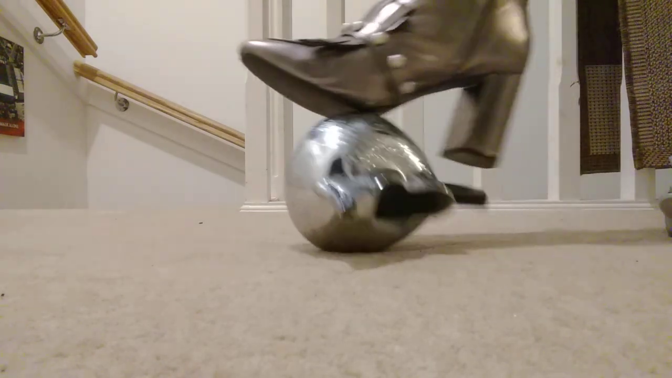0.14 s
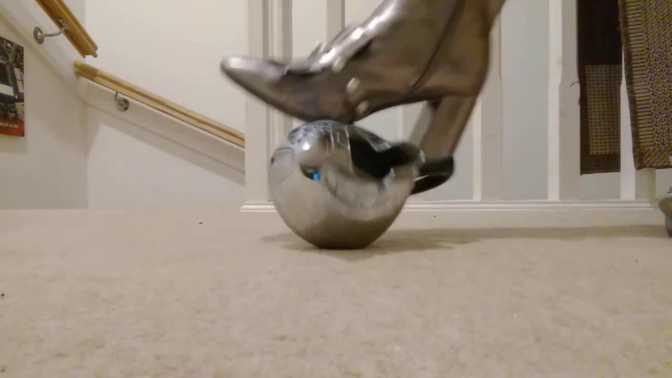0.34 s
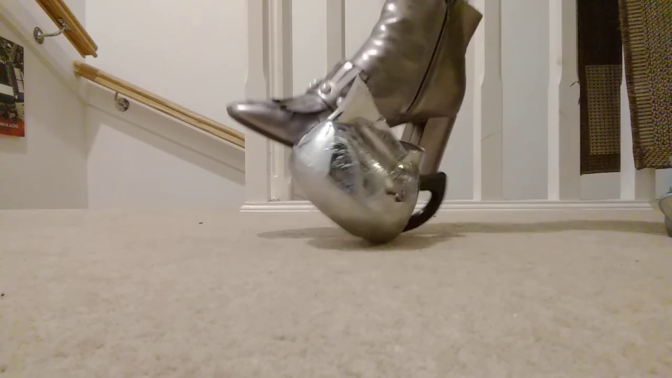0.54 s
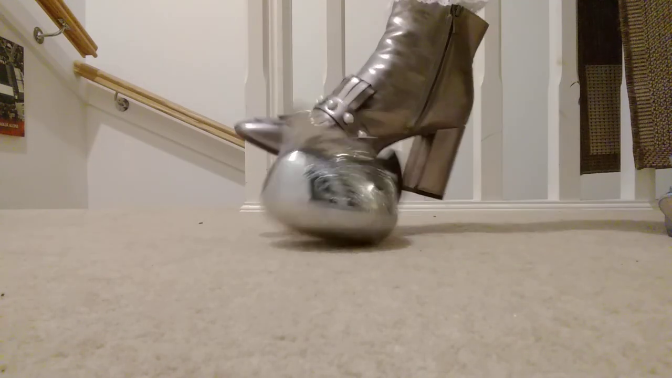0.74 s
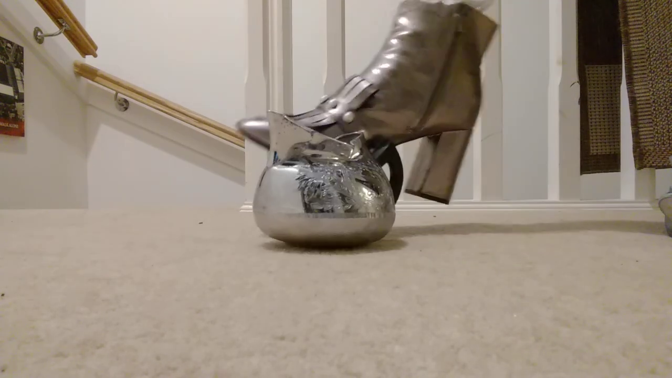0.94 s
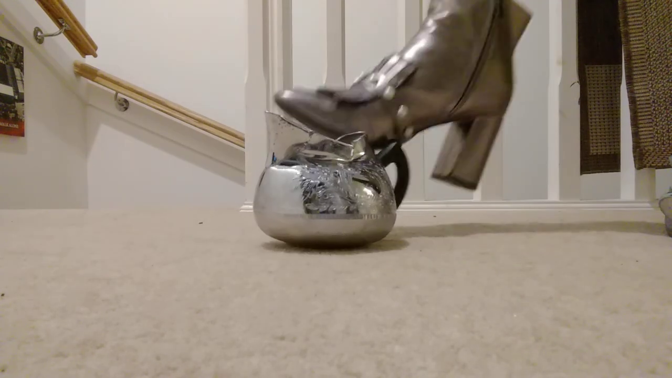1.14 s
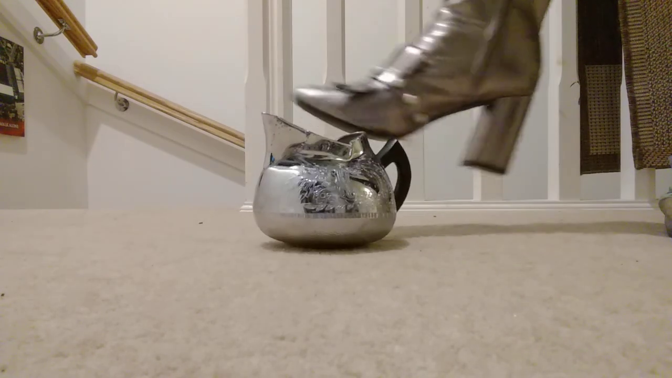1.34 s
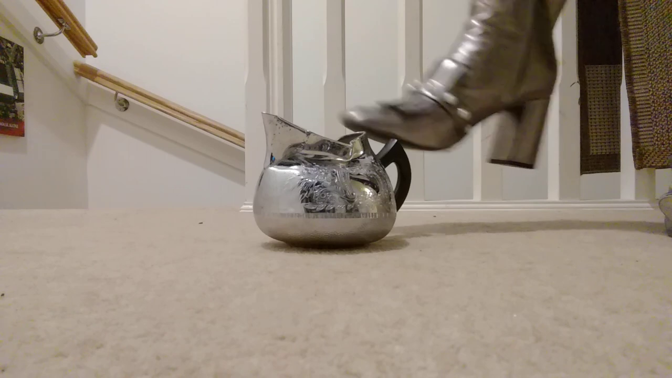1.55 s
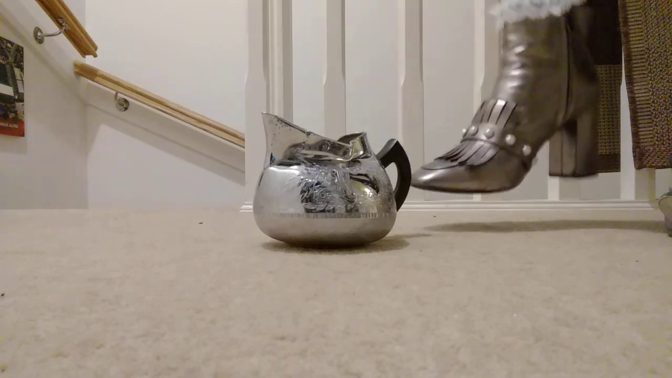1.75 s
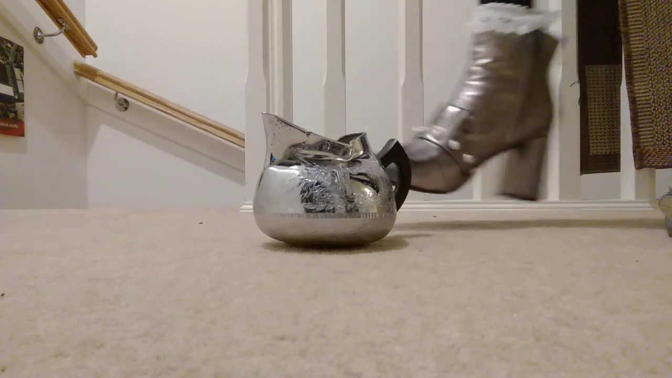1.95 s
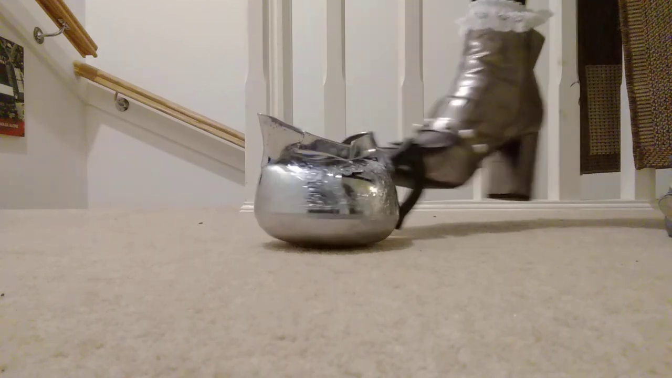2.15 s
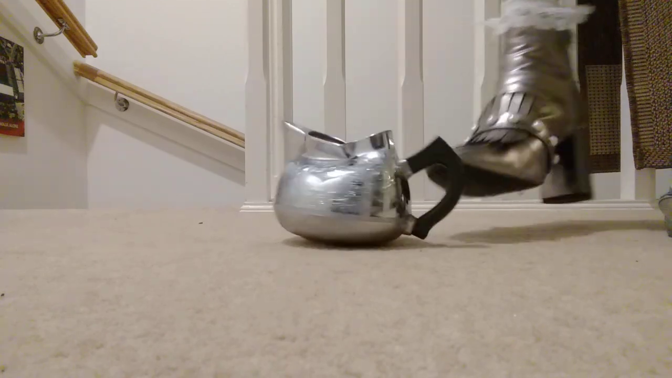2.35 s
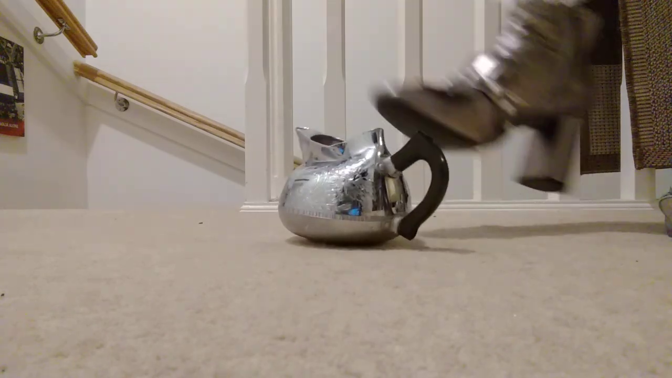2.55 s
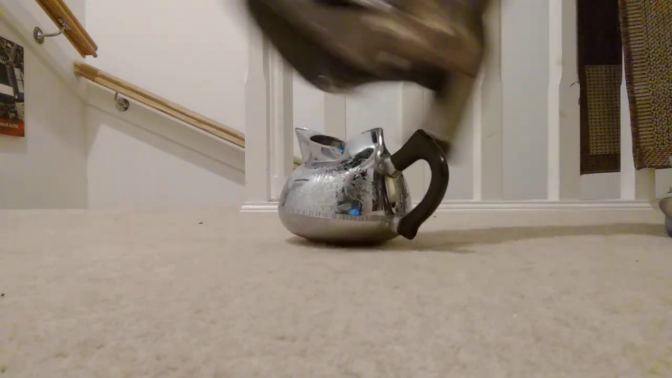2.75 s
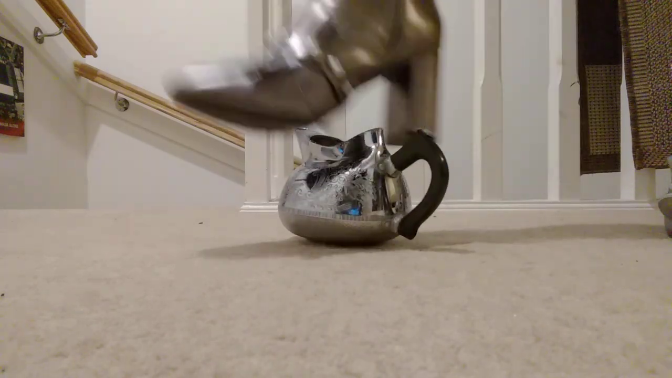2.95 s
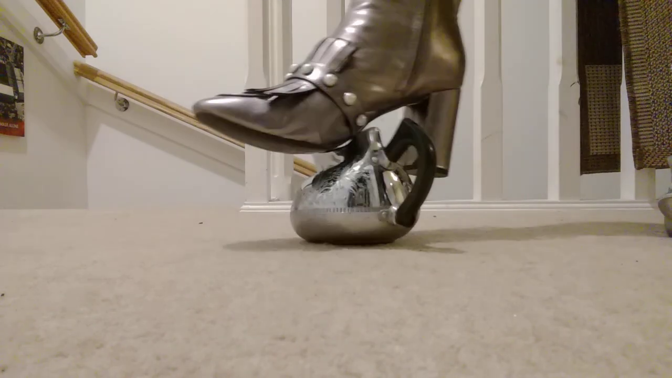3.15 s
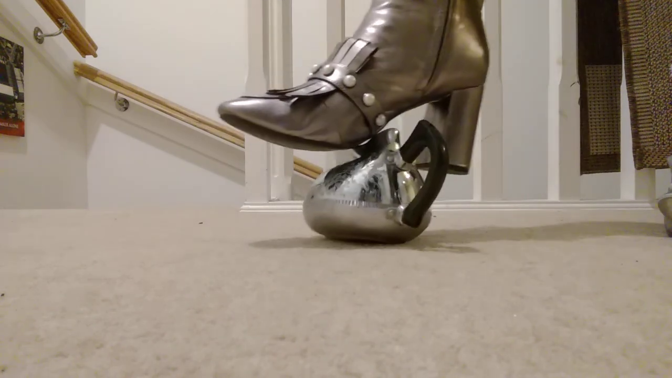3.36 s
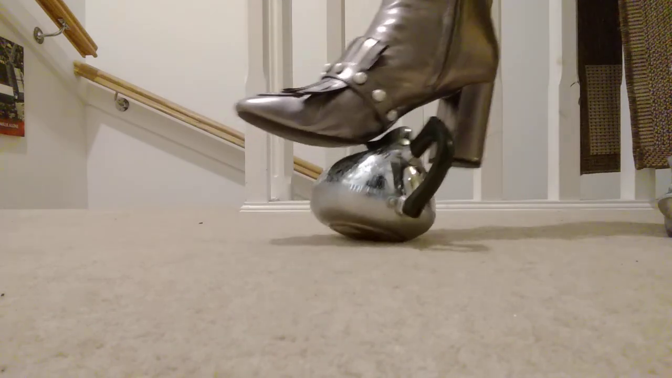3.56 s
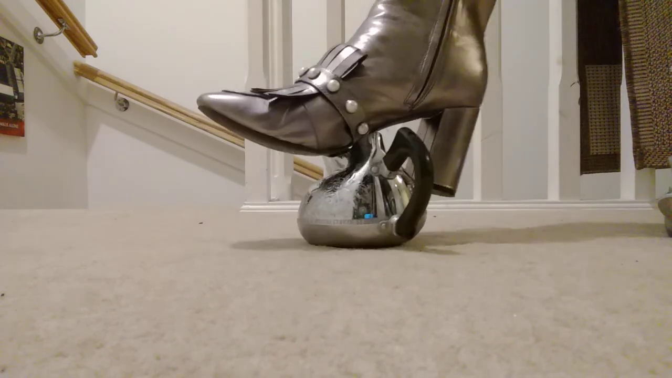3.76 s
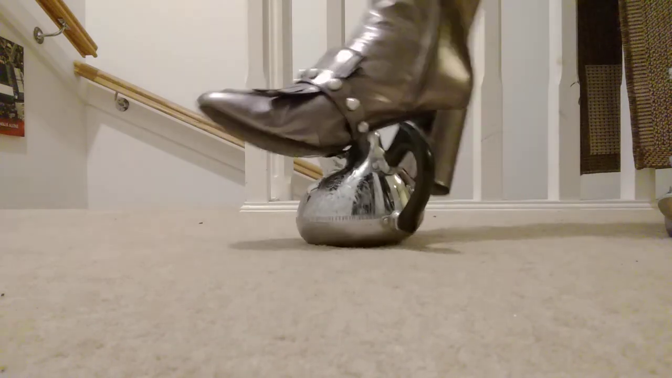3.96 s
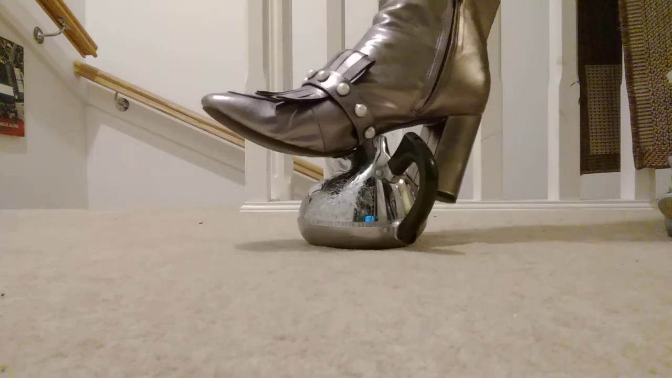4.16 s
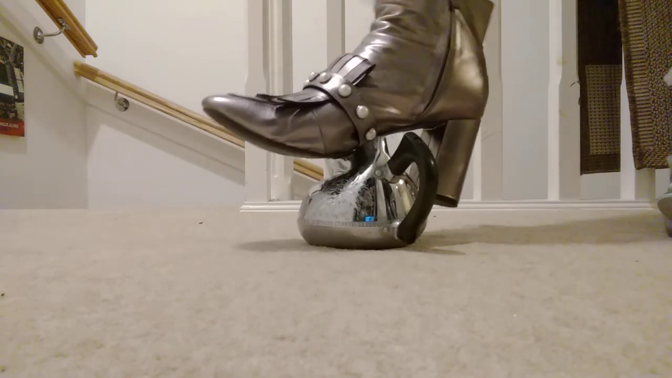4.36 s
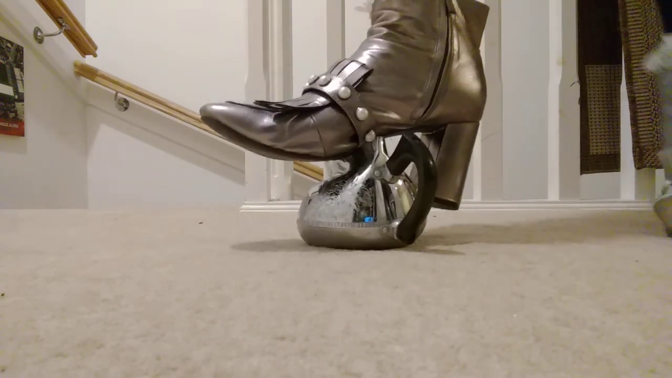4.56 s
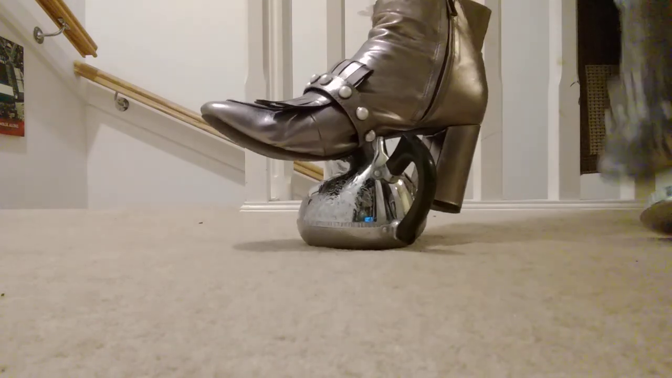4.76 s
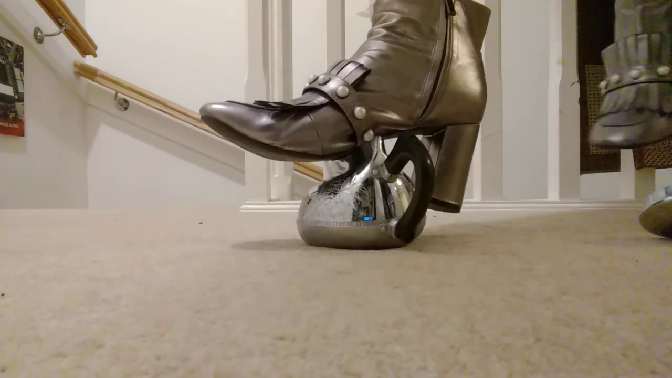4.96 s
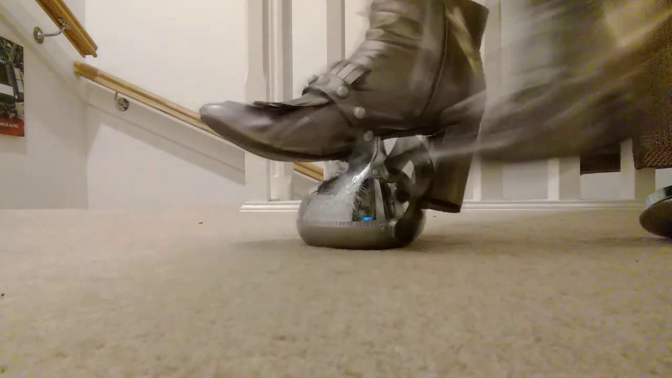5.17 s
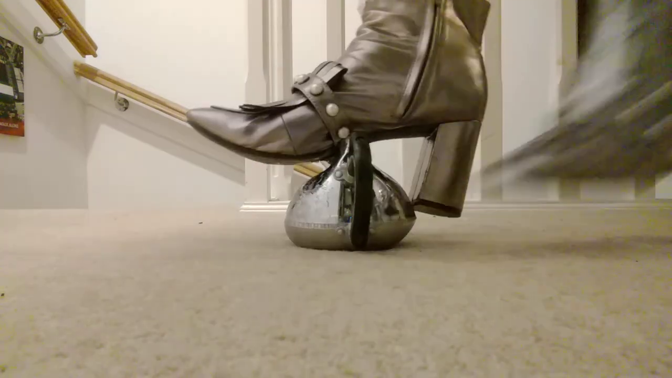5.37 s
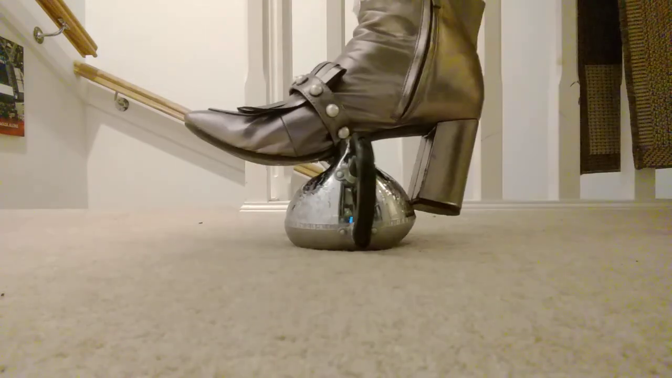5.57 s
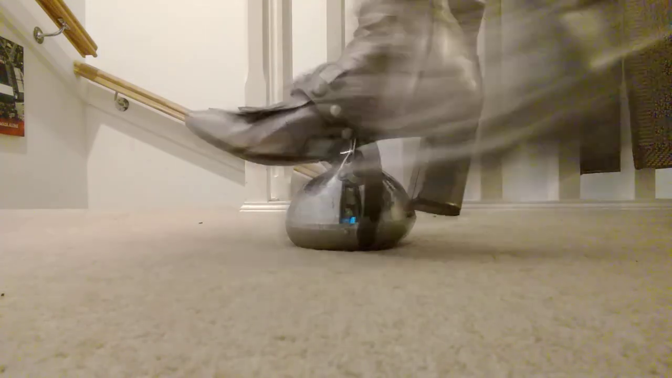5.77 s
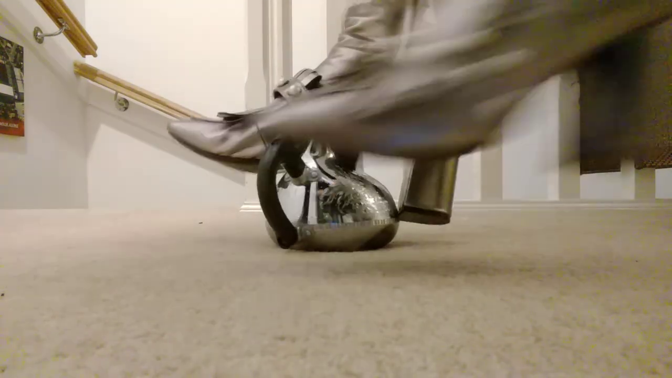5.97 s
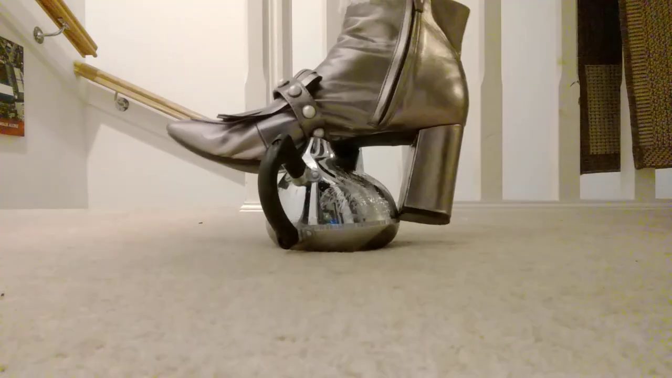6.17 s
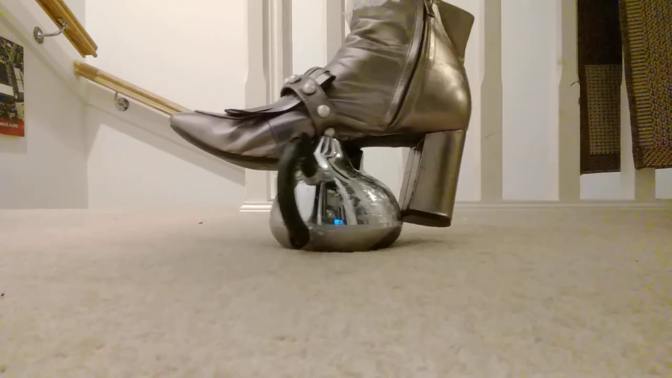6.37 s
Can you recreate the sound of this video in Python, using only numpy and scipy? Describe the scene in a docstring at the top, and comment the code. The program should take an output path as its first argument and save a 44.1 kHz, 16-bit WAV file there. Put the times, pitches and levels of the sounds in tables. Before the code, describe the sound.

A high-heeled boot rolls a thin steel teapot over carpet with a soft scrape, and the pot clanks twice with a brief ring. Light ticks follow, then two stamps land as hollow clonks with gritty slides and dull floor thuds. Two sharp kicks knock the pinned pot, the first trailing a faint squeal. The microphone is close, near the floor of a small room with faint rumble and hiss.

```python
"""A thin steel teapot on carpet: a high-heeled boot rolls it upright, stamps on it and pins it while
the other boot kicks it round. Free, the dented shell clanks and rings; clamped under the sole it only
knocks and clonks, and the wooden floor thuds below the carpet. Between the blows, boots and pot rub,
tick and squeal. A small room with a faint rumble and hiss, heard by a close pair of microphone ports
near the floor."""
import sys
import numpy as np
from scipy import signal
from scipy.fft import rfft, irfft, next_fast_len
from scipy.io import wavfile

SR = 44100
rng = np.random.default_rng(int(sys.argv[2]) if len(sys.argv) > 2 else 0)


def wrap_up_sound(samples):
    """Save the sound to the file named by the first command line argument, as 16-bit audio."""
    columns = np.atleast_2d(samples).T
    # keep every value between -1 and 1, then stretch to whole-number steps
    tamed = np.clip(columns, -1, 1)
    steps = np.round(tamed * 32767).astype(np.int16)
    wavfile.write(sys.argv[1], SR, steps)


N = 283122
TIME = np.arange(N) / SR
RING_TIME = TIME[:SR // 2]  # the half second given to each hit


# clanks of the free pot: (time [s], ring [dB], place [-1 top, 0 belly, 1 rim], ring time [factor],
# knock [dB], crack [dB])
POT_CLANKS = [(0.7387, -30.5, -0.015, 0.99, -23.5, -34.5), (0.7508, -61, -0.43, .6, -34.5, -52),
              (0.769, -52, 0.35, 0.42, -37, -48.5), (0.994, -36.5, 0.95, 1.27, -38, -34),
              (1.1097, -68, 0.43, 0.83, -45.5, -65), (2.971, -31, -0.87, 0.44, -33.5, -44.5),
              (2.9796, -37, -.6, 0.26, -35.5, -52), (2.997, -44.5, -1, 0.28, -51.5, -50)]
# knock of the hard sole and handle: (frequency [Hz], level [dB], t60 [s])
SOLE_MODES = [(738.5, 1.5, 0.011), (1070, 2.5, 0.014), (1423, -1.5, 0.011), (2050, -9.5, 0.01)]
# the pot's base driven into the carpet: (frequency [Hz], level [dB], t60 [s])
BASE_MODES = [(164, -4, 0.047), (304, 1.5, 0.018), (467, 1, 0.0064)]
# dull slap under a knock: (frequency [Hz], level [dB])
SLAP_COLOUR = [(100, -24.5), (600, -5.5), (1200, 5.5), (1800, 3), (3000, -10.5), (4500, -24),
               (15000, -34.5)]
# bright clash of the rim slipping off the sole: (frequency [Hz], level [dB])
CLASH_COLOUR = [(500, -20.5), (2500, -10), (3800, 4), (6500, 4), (8500, 4), (10000, 3), (15000, -35)]

def clanks(base_db=4, rattle_db=-16, slap_db=-5, wobble_db=2.2):
    """The free pot drops on its base, chatters on the boot and rings, wobbling as it rocks."""
    out = np.zeros(N)
    for s, ring_db, place, ring_scale, knock_db, crack_db in POT_CLANKS:
        wobble = wobble_db * wander(88)[:len(RING_TIME)]
        modes = shell(place)
        steel = ring(modes + twins(modes), ring_scale) + ring(wall_modes(place), ring_scale)
        add(out, s, amp(ring_db + wobble) * steel)
        slap = amp(slap_db) * crack(0.0021, SLAP_COLOUR)
        base = amp(base_db) * (1 - place) * ring(BASE_MODES)
        add(out, s, amp(knock_db) * (ring(SOLE_MODES) + slap + base))
        attack = crack(0.0065, CRACK_COLOUR)
        rattle = amp(rattle_db) * crack(0.087, CRACK_COLOUR, grain_db=4)
        clash = place * crack(0.015, CLASH_COLOUR)
        add(out, s, amp(crack_db) * (attack + rattle + clash))
    return out


# ring of the free shell: (frequency [Hz], pressed on top [dB], belly hit [dB], rim hit [dB], t60 [s])
SHELL_MODES = [(443, 5, 5, -19, .15), (797, -16, -12, -12, .32), (1194, -1.5, -2.5, -19, .26),
               (1505, -14, -11, -17, .2), (1673, -18, -3.5, -15, .24), (1743, -24, -24, -8, .26),
               (1933, -22, -20, -22, .2), (2105, -24, -17, -27, .14), (2229, -22, -18, -23, .14),
               (2365, -24, -19, -28, .1), (3065, -24, -21, 2.5, .2), (3131, -14, -12, -18, .11),
               (3605, -28, -28, -8, .13), (3871, -18, -20, -6, .15), (3960, -22, -19, -20, .12),
               (4818, -32, -32, -14, .17), (5160, -26, -28, -3, .14), (5235, -27, -27, -18, .16),
               (5674, -19, -21, -22, .19), (6035, -35, -35, -1.5, .17), (6281, -36, -36, -10, .16),
               (6340, -36, -36, -13, .22), (6710, -42, -42, -10, .18), (7600, -42, -42, -11, .15),
               (8790, -40, -40, -13, .16)]

def shell(place):
    """The free pot's modes, weighted by where it is struck."""
    return [(hz, np.interp(place, [-1, 0, 1], levels), t60) for hz, *levels, t60 in SHELL_MODES]


def twins(modes):
    """Dents split each mode: a weaker, shorter twin 1-4 % away beats against it."""
    return [(hz * (1 + rng.choice([-1, 1]) * rng.uniform(.01, .04)), db - 11, t60 / 2)
            for hz, db, t60 in modes]


def wall_modes(place, level_db=-24.5, count=80):
    """The dented wall's crowd of weak modes: a belly hit favours the low ones, a rim hit rings all."""
    hz = np.geomspace(850, 10500, count) * rng.uniform(.98, 1.02, count)
    db_per_octave = -4.5 * (1 - np.clip(place, 0, 1))
    db = level_db + db_per_octave * np.log2(hz / 1000) + 2 * rng.standard_normal(count)
    t60 = rng.uniform(.07, .17, count)
    return np.column_stack([hz, db, t60])


# stamps and kicks on the pinned pot: (time [s], crack [dB], grit [dB], bite [dB], sole [dB], snap [dB],
# clonk [dB], clonk ring time [factor], clonk pitch before limiting [factor], crunch [dB],
# delay to the floor [s], base [dB], boards [dB])
BOOT_BLOWS = [(2.972, -43, -52, -63.5, -38, -55, -36, 1, 0.87, -58, .012, -38, -28),
              (3.0195, -17.5, -19.5, -37.5, -29, -31, -21.5, 2, 1.07, -58, 0.006, -50, -26.5),
              (3.583, -38.5, -52, -45, -35.5, -48, -37, 2.1, 1.02, -54.5, .003, -59.5, -38),
              (3.6536, -28.5, -20, -49.5, -19, -25.5, -9, .95, 0.995, -28.5, 0.0025, -21.5, -16.5),
              (5.1653, -13.5, -14, -42.5, -10.5, -15, -22, 0.83, 1, -40, .0055, -4.5, -27),
              (5.7640, -16.5, -29, -39.5, -9, -25, -19.5, 0.87, 0.97, -39, .0055, -4, -27)]
# crack of hard surfaces meeting: (frequency [Hz], level [dB])
CRACK_COLOUR = [(100, -15), (700, 10.5), (3000, 4), (5000, -8.5), (8000, -6), (11000, 1), (15000, -2.5)]
# steel snapping in where it is hit: (frequency [Hz], level [dB], t60 [s])
SNAP_MODES = [(2450, 0.5, 0.0099), (2850, -3, 0.0087)]
# crunch of steel giving way under load: (frequency [Hz], level [dB])
CRUNCH_COLOUR = [(80, -10), (280, 4.5), (500, 2), (900, -1), (1500, -10.5), (3000, -32.5), (15000, -50)]
# bite of steel buzzing against the boot: (frequency [Hz], level [dB])
BITE_COLOUR = [(1000, -16.5), (2800, -1), (4000, 1.5), (4800, -4.5), (6200, -0.5), (7500, -5), (14000, -9)]

def blows(knock_lag_s=0.00014, slap_db=-5, crunch_s=0.075, bite_s=0.014):
    """Each blow cracks, grates and knocks in the sole; the steel snaps, crunches and buzzes under it."""
    out = np.zeros(N)
    for s, crack_db, grit_db, bite_db, sole_db, snap_db, _, _, _, crunch_db, *_ in BOOT_BLOWS:
        add(out, s, amp(crack_db) * crack(0.00091, CRACK_COLOUR))
        add(out, s, amp(grit_db) * crack(0.0024, SWISH_COLOUR))
        add(out, s, amp(sole_db + slap_db) * crack(0.0019, SLAP_COLOUR))
        add(out, s + knock_lag_s, amp(sole_db) * ring(SOLE_MODES) + amp(snap_db) * ring(SNAP_MODES))
        add(out, s, amp(crunch_db) * crack(crunch_s, CRUNCH_COLOUR))
        add(out, s, amp(bite_db) * crack(bite_s, BITE_COLOUR, grain_db=5))
    return out


# hollow body of the clamped pot, main mode first: (frequency [Hz], level [dB], t60 [s])
PINNED_MODES = [(386, 3.5, .066), (327, -14, .11), (275, -11, .12), (222, -18, .12), (410, -15, .12),
                (533, -20, .13), (668, -21, .16), (755, -27, .12), (867, -29, .1), (1095, -33, .12),
                (1450, -38, .14)]
# its thin, beating tail: (frequency [Hz], level [dB], t60 [s])
HUM_MODES = [(383, -19.5, .46), (364, -27, .34)]

def clonks(rise_s=0.0025, hum_db=0.5, flex_db=2, flex_s=0.061, soft_db_per_octave=7):
    """The clamped pot clonks, slower and purer under a soft blow; its hum wavers as the wall flexes."""
    out = np.zeros(N)
    main_hz = PINNED_MODES[0][0]
    for s, *_, clonk_db, ring_scale, pitch, _, _, _, _ in BOOT_BLOWS:
        pitch = np.clip(pitch, .995, 1.025)
        rolloff = soft_db_per_octave * max(ring_scale - 1, 0)
        modes = [(hz, db - rolloff * abs(np.log2(hz / main_hz)), t60) for hz, db, t60 in PINNED_MODES]
        body = ring(modes, ring_scale, pitch) + amp(hum_db) * ring(HUM_MODES, pitch=pitch)
        swell = 1 - np.exp(-RING_TIME / (rise_s * ring_scale))
        flex = amp(flex_db * wander(45)[:len(RING_TIME)] * np.minimum(RING_TIME / flex_s, 1))
        add(out, s, -amp(clonk_db) * swell * flex * body)
    return out


# boom of the floorboards: (frequency [Hz], level [dB], t60 [s])
BOARD_MODES = [(91, -10, 0.12), (104, -6, 0.13), (132.4, 8, 0.062), (181.7, -12, 0.12)]

def thuds():
    """Just after a blow the pot's base bottoms out in the carpet and shakes the boards."""
    base, boards = np.zeros((2, N))
    for s, *_, delay_s, base_db, boards_db in BOOT_BLOWS:
        add(base, s + delay_s, -amp(base_db) * ring(BASE_MODES))
        add(boards, s + delay_s, amp(boards_db) * ring(BOARD_MODES))
    return base, boards


# slides of the sole: (start [s], peak [s], end [s], hiss [dB], scrape [dB])
SOLE_SKIDS = [(2.977, 3.045, 3.11, -41.5, -41), (3.649, 3.662, 3.71, -42, -47),
              (5.267, 5.288, 5.35, -60.5, -52.5), (5.768, 5.778, 5.85, -53, -51)]
# boot and pot scraping: (frequency [Hz], level [dB])
SCRAPE_COLOUR = [(60, -11), (250, 6.5), (420, 3), (600, 3.5), (1100, 0.5), (3000, -8), (6000, -17),
                 (14000, -20), (14800, -42.5)]

def skids(edge_db=-14, grain_db=3):
    """The sole slides on the steel in a short gritty hiss."""
    out, hiss, scrape = np.zeros(N), friction(), noise(SCRAPE_COLOUR)
    for start, peak, end, hiss_db, scrape_db in SOLE_SKIDS:
        fade_db = np.interp(TIME, [start, peak, end], [edge_db, 0, 2 * edge_db], left=-100, right=-100)
        out += amp(fade_db) * (amp(hiss_db) * hiss + amp(scrape_db) * scrape)
    return out * amp(grain_db * wander(630))


# bright swish of friction: (frequency [Hz], level [dB])
SWISH_COLOUR = [(500, -30.5), (2000, -9.5), (6000, -16), (8500, -9), (11000, 3), (14100, -4.5),
                (14700, -27.5), (16000, -39)]

def friction(slips_per_s=1500, slip_spread_db=0.5, whistle_db=1, count=48):
    """Tiny slips of the sole on steel: a gritty hiss that makes the wall's highest modes whistle."""
    strength = amp(slip_spread_db * np.minimum(rng.exponential(1, N), 4))
    slips = strength * rng.choice([-1, 1], N) * (rng.random(N) < slips_per_s / SR)
    hz = rng.uniform(8000, 14200, count)
    db = 3 * rng.standard_normal(count)
    t60 = rng.uniform(.015, .05, count)
    whistle = signal.fftconvolve(slips, ring(zip(hz, db, t60)))[:N]
    hiss = unit(colour(slips, SWISH_COLOUR))
    return unit(hiss + amp(whistle_db) * unit(colour(whistle, SWISH_COLOUR)))


# squeals of steel under the sole: (start [s], length [s], pitch [Hz], level [dB])
STEEL_SQUEALS = [(3.039, .04, 10550, -41), (5.28, .42, 1529, -60), (5.28, .22, 2756, -63),
                 (5.265, .12, 2060, -56.5), (5.265, .19, 4613, -65.5)]

def squeals(waver=0.004, stutter_db=3, peak_share=0.24):
    """Thin tones swell, stutter and die away as the steel turns under the sole."""
    out = np.zeros(N)
    for s, length, hz, db in STEEL_SQUEALS:
        size = int(length * SR)
        u = np.linspace(0, 1, size) / peak_share
        swell = (u * np.exp(1 - u)) ** 3
        stutter = amp(stutter_db * wander(110)[:size])
        cycles = np.cumsum(hz * (1 + waver * wander(60)[:size])) / SR
        add(out, s, amp(db) * swell * stutter * np.sin(2 * np.pi * cycles))
    return out


# drags over the carpet: (fastest moment [s], length [s], swish of leather and pile [dB],
# pot scrape [dB], pot ring [dB])
CARPET_DRAGS = [(0.08, 0.41, -60, -64.5, -76), (0.309, 0.075, -77, -63, -54), (0.38, 0.19, -49.5, -56, -58),
                (1.078, 0.46, -76, -65.5, -73), (2.044, 0.32, -79, -61, -63),
                (2.201, 0.15, -64.5, -65.5, -70), (2.389, 0.1, -66, -64.5, -70),
                (2.905, 0.13, -62, -65.5, -69), (3.19, 0.11, -66.5, -58, -58), (3.282, 0.28, -57, -59, -65),
                (4.295, 0.075, -68, -69, -60.5), (4.537, 0.41, -68, -58.5, -69.5),
                (4.87, 0.17, -70, -72, -76.5), (5.065, 0.25, -68, -67, -74), (5.5, 0.17, -81, -83.5, -87.5)]

def rubbing(rumble_db=-3, grain_db=1, patchy_db=1.4):
    """Leather and steel drag over the pile, stirring the floor and keeping the pot faintly ringing."""
    speeds = np.array([drag_speed(s, length) for s, length, *_ in CARPET_DRAGS])
    swish, scrape, sing = amp(np.transpose(CARPET_DRAGS)[2:]) @ speeds
    catch = amp(grain_db * wander(400) + patchy_db * wander(35))  # fibres catch and let go
    out = catch * (swish * friction() + scrape * noise(SCRAPE_COLOUR))
    pinned = TIME > BOOT_BLOWS[0][0]
    free_ring = ring(shell(place=0.16), ring_scale=.8)
    for body, drive in [(free_ring, sing * ~pinned), (ring(HUM_MODES), sing * pinned)]:
        out += signal.fftconvolve(drive * rng.standard_normal(N), body / np.linalg.norm(body))[:N]
    return out + amp(rumble_db) * scrape * noise(RUMBLE_COLOUR)


def drag_speed(s, length, rise_share=0.35):
    """One drag speeds up until time s and slows more gently, in a lopsided bell."""
    u = (TIME - s) / (length * np.where(TIME < s, rise_share, 1 - rise_share))
    return np.exp(-u * u)


# light touches: (time [s], click [dB], tap [dB])
TOUCHES = [(1.18, -75, -55), (1.42, -43.5, -70), (1.801, -42, -68), (1.8107, -43, -53.5), (1.875, -43, -59),
           (1.949, -39, -56.5), (2.034, -63, -54), (2.78, -53, -61.5), (2.874, -36, -47.5),
           (3.083, -51, -46.5), (3.149, -40, -58), (3.165, -39, -44), (3.1854, -49, -46),
           (3.752, -46.5, -52), (3.815, -57, -55), (4.013, -43.5, -57), (4.022, -69, -52),
           (4.1776, -47, -60), (4.2901, -52.5, -62), (5.253, -34.5, -53), (5.279, -42.5, -53)]
# click of a touch: (frequency [Hz], level [dB])
CLICK_COLOUR = [(500, -20.5), (2000, -2), (4500, -19), (6500, -6), (11000, -2.5), (14000, -4)]
# tap on the handle: (frequency [Hz], level [dB], t60 [s])
TAP_MODES = [(980, -6, 0.048), (1059, -1, 0.047), (1194, -3.5, 0.033), (1504, -6, 0.032)]

def ticks():
    """Sole, buckle and handle touch lightly: a tiny bright click and a small tap."""
    out = np.zeros(N)
    for s, click_db, tap_db in TOUCHES:
        add(out, s, amp(click_db) * crack(0.0015, CLICK_COLOUR) + amp(tap_db) * ring(TAP_MODES))
    return out


# weight shifting on the floor: (time [s], level [dB], length [s])
WEIGHT_SHIFTS = [(2.031, -46, 0.017), (3.203, -46.5, 0.16), (4.066, -43, 0.017), (4.238, -48.5, 0.043),
                 (4.296, -44.5, 0.032), (4.505, -44.5, 0.067), (5.256, -45.5, 0.03), (5.635, -59, 0.02)]
# low rumble of the floor: (frequency [Hz], level [dB])
RUMBLE_COLOUR = [(20, -26), (50, -13), (90, -1.5), (160, 0), (300, -11.5), (600, -28), (3000, -62.5)]

def treads():
    """Soft pushes through the carpet stir the floor."""
    push = np.zeros(N)
    for s, db, length in WEIGHT_SHIFTS:
        u = RING_TIME / length * 2
        add(push, s, amp(db) * u * np.exp(1 - u))
    return push * noise(RUMBLE_COLOUR)


# reverb decay: (frequency [Hz], t60 [s])
ROOM_DECAY = [(80, 0.45), (250, 0.4), (1000, 0.26), (4000, 0.3), (12000, 0.38)]
# reverb tone: (frequency [Hz], level [dB])
ROOM_COLOUR = [(60, -4.5), (150, -8.5), (350, -10.5), (650, -12), (1200, -18.5), (3000, -25),
               (12000, -21.5)]

def room(x, onset_s=0.01):
    """The small room's dense echoes build up quickly and die band by band."""
    hz, t, bands = signal.stft(rng.standard_normal(SR), SR, nperseg=256)
    t60 = read(ROOM_DECAY, hz)[:, None]
    equal_energy = np.sqrt(np.log(10 ** 6) / (t60 * SR))
    tail = signal.istft(bands * amp(-60 * t / t60) * equal_energy, SR, nperseg=256)[1][:SR]
    build_up = 1 - np.exp(-(TIME[:SR] / onset_s) ** 2)
    return signal.fftconvolve(x, colour(tail * build_up, ROOM_COLOUR))[:N]


# bed of rumble and hiss: (frequency [Hz], level [dB])
BED_COLOUR = [(20, -22.5), (50, -11), (90, -2), (160, 2), (300, -6.5), (600, -11.5), (1400, -14),
              (2200, -22), (3300, -18.5), (6000, -19.5), (10800, -23.5), (12000, -19), (14100, -29.5),
              (14900, -50)]

def background(level_db=-61.5, waver_db=-2.5, sink_at_s=5.2, sink_s=0.098, sink_db=-10):
    """A wavering bed of rumble and hiss that sinks just after the first kick and stays down."""
    sunk = np.clip((TIME - sink_at_s) / sink_s, 0, 1)
    return amp(level_db + sink_db * sunk + waver_db * wander(14)) * noise(BED_COLOUR)


def ring(modes, ring_scale=1, pitch=1):
    """Dying sines set off by one blow; neighbouring modes start in opposite directions."""
    t = RING_TIME
    return sum((-1) ** k * amp(db - 60 * t / (t60 * ring_scale)) * np.sin(2 * np.pi * hz * pitch * t)
               for k, (hz, db, t60) in enumerate(modes))


def crack(decay_s, spectrum, grain_db=0):
    """The noise burst of surfaces meeting; grain_db breaks it into crackling 64-sample grains."""
    fade = np.exp(-RING_TIME / decay_s)
    grains = np.repeat(amp(grain_db * rng.standard_normal(len(fade) // 64 + 1)), 64)[:len(fade)]
    burst = unit(fade * grains * rng.standard_normal(len(fade))) * np.sqrt(np.mean(fade ** 2))
    return colour(burst, spectrum)


def noise(spectrum):
    """Steady noise of a given colour, at an rms of one."""
    return unit(colour(rng.standard_normal(N), spectrum))


def colour(x, spectrum, size=4096):
    """Minimum-phase EQ: nothing sounds before an attack."""
    log_gain = np.log(amp(read(spectrum, abs(np.fft.fftfreq(size, 1 / SR)))))
    taps = np.fft.ifft(np.exp(signal.hilbert(log_gain).conj())).real[:size // 2]
    return signal.fftconvolve(x, taps)[:len(x)]


def wander(per_s):
    """Random modulation that glides to a new value per_s times a second."""
    return np.interp(TIME * per_s, np.arange(N), rng.standard_normal(N))


def read(points, hz):
    """Reads a table on a log-frequency axis."""
    f, value = np.transpose(points)
    return np.interp(np.log(hz + 1), np.log(f + 1), value)


def add(mix, s, sound):
    """Mixes a sound in at time s."""
    part = mix[max(round(s * SR), 0):][:len(sound)]
    part += sound[:len(part)]


def amp(db):
    """Decibels to gain."""
    return 10 ** (np.asarray(db) / 20)


def unit(x):
    """Scales to an rms of one."""
    return x / np.sqrt(np.mean(x ** 2) + 1e-20)


def scene(clonk_send_db=-5, floor_send_db=-2, floor_pan_db=1, air_pan_db=0.95):
    """Pot and boots in the centre; floor, reverb and background lean left."""
    hits = clanks() + blows() + ticks() + skids() + squeals()
    clonk = clonks()
    base, boards = thuds()
    send = hits + amp(clonk_send_db) * clonk + amp(floor_send_db) * (base + boards)
    # fresh diffuse sound, in opposite polarity at the two ports, widens the image
    width = amp(-4) * room(send) + amp(-10) * rubbing() + amp(-9) * background()
    side = np.array([[1], [-1]])
    floor = amp(floor_pan_db * side) * (base + boards + treads())
    air = amp(air_pan_db * side) * (room(send) + background())
    return hits + clonk + rubbing() + floor + air + side * width


# microphone tone: (frequency [Hz], level [dB])
MIC_COLOUR = [(15, -27.5), (40, -9.5), (75, 1), (7500, 2), (9500, 4.5), (10600, 5.5), (13400, 11.5),
              (14300, 9), (14900, -12.5), (16000, -16.5)]
# stereo balance: (frequency [Hz], left minus right [dB])
PORT_BALANCE = [(60, 2.5), (150, 1.5), (400, -3.5), (1200, -1.5), (2600, -2), (5000, -3), (9000, -6),
                (14000, -6)]
# phase between the ports: (frequency [Hz], lead of the left [rad])
PORT_LEAD = [(0, -2.3), (300, -2.1), (410, -.7), (900, .25), (1400, -.6), (2350, -3.14), (16630, -40.84)]

def record(dry):
    """Two spaced ports with a bright treble peak, clipping at full scale, then a steep low-pass."""
    size = next_fast_len(N + SR)
    hz = np.fft.rfftfreq(size, 1 / SR)
    spectra = rfft([colour(channel, MIC_COLOUR) for channel in dry], size)
    tilt = amp(read(PORT_BALANCE, hz) / 2)
    lead = np.exp(1j * np.interp(hz, *np.transpose(PORT_LEAD)))
    ports = irfft(spectra * [tilt * lead, 1 / tilt], size)[:, :N]
    lowpass = signal.firwin(511, cutoff=16050, window=("kaiser", 9), fs=SR)
    return signal.oaconvolve(np.clip(ports, -1, 1), lowpass[None], "same")


dry = scene()
out = record(dry)
wrap_up_sound(out)
```